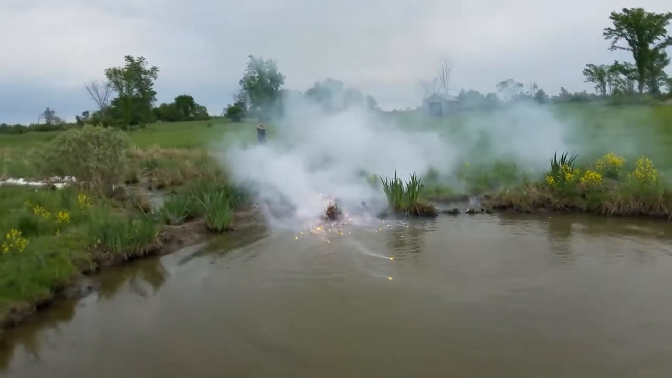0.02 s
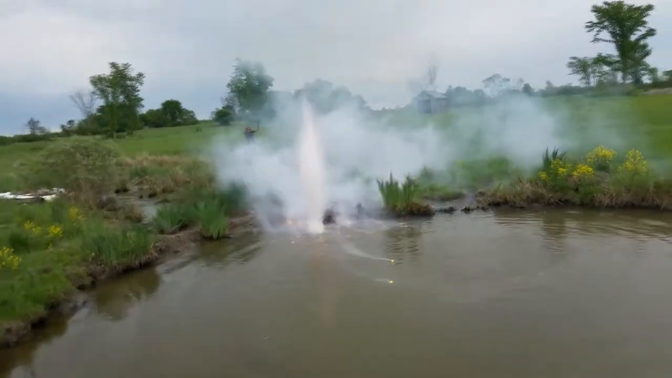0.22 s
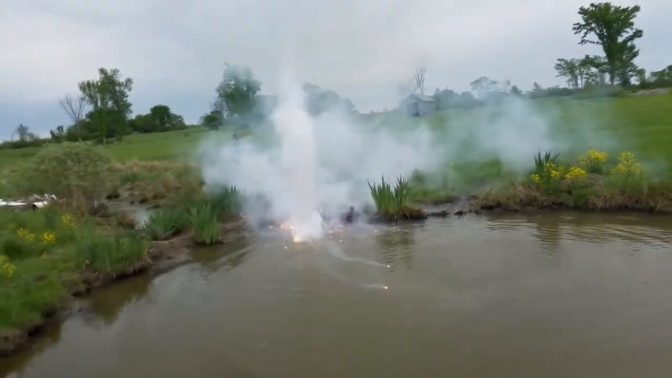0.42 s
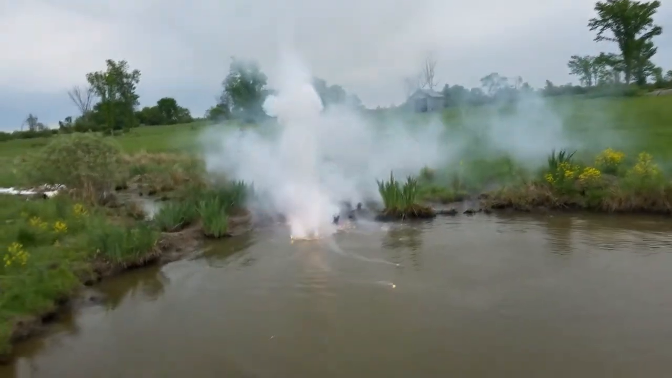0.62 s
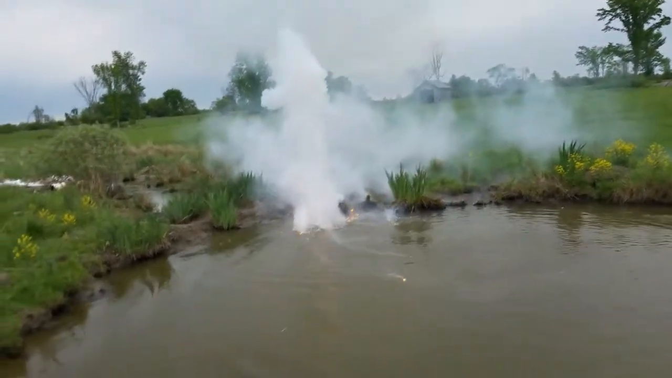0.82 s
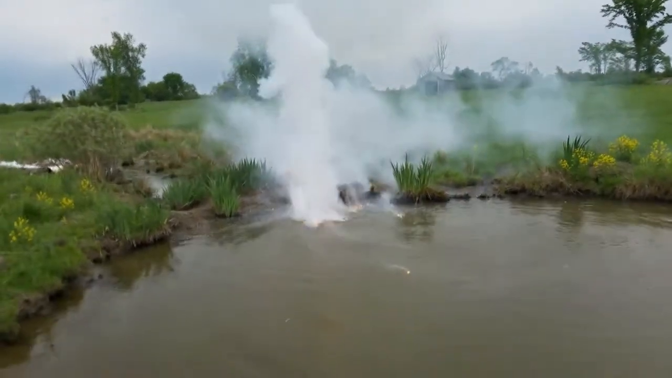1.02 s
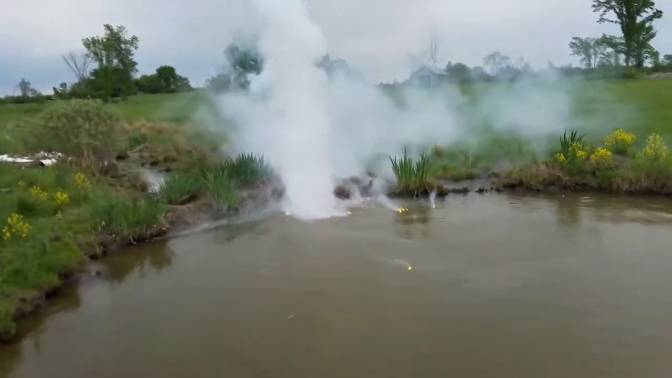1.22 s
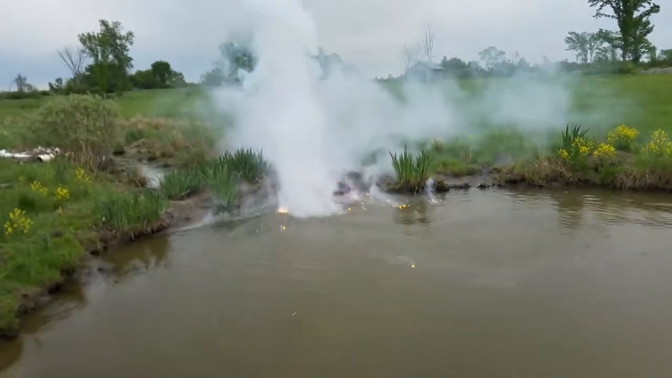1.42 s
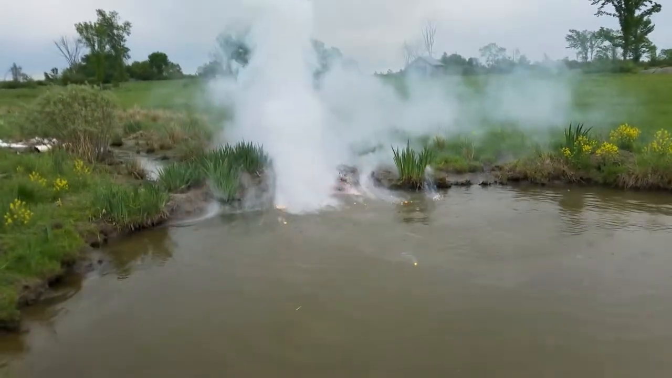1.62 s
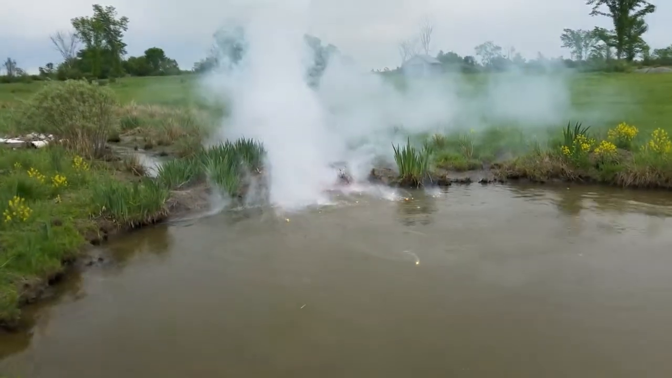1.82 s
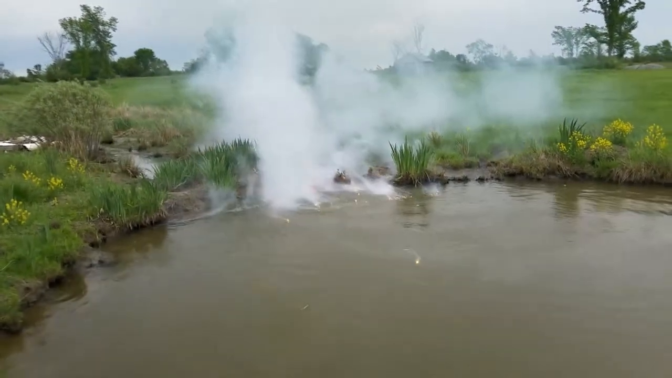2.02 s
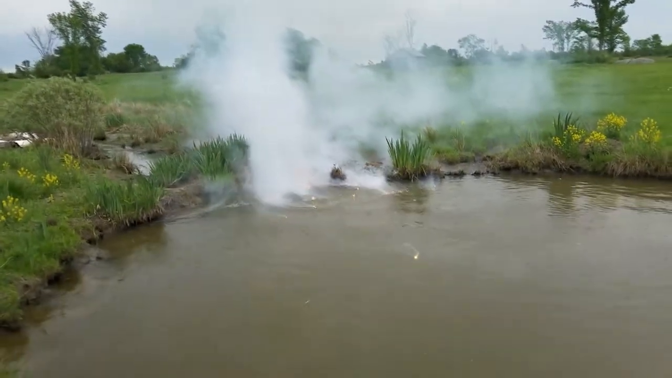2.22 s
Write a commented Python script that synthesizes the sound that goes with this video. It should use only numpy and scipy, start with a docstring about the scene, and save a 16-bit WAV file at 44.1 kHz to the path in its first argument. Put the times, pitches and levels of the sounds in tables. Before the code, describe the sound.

Sodium burning on an outdoor pond: crackling fizz and sharp pops from 0 s, then a hard bang at 0.22 s with a ringing, noisy spray burst and short dark roll. Fizz and breeze drop low. Strong pops hit at 0.47, 0.61, a cluster at 0.90-0.97, and 1.04 s. Sparse clicks and faint rising drops follow; fizz recovers from about 1.9 s, with more pops until 2.3 s.

```python
"""An outdoor pond: chunks of sodium burn on the water, some metres from two small microphone ports.
Pockets of hydrogen pop as sharp spikes that ring with their cavities; one chunk goes off as a blast
wave with a burst of noisy spray. Ticks and hiss make the fizz, single clicks the larger bubbles, and
short rising notes the drops that fall back. Echoes and dying noise give the banks and the field, over
a low wash of breeze and stirred water. Fizz and wash are heard lower after the bang, then recover."""
import sys
import numpy as np
from scipy import signal
from scipy.fft import rfft, irfft
from scipy.io import wavfile
from scipy.ndimage import uniform_filter1d

SR = 44100
rng = np.random.default_rng(int(sys.argv[2]) if len(sys.argv) > 2 else 0)


def file_out(sig):
    """Save sig as 16-bit WAV at sys.argv[1]."""
    # one column per channel
    cols = np.atleast_2d(sig).T
    # limit, then scale
    lim = np.clip(cols, -1, 1)
    pcm = np.round(lim * 32767).astype(np.int16)
    wavfile.write(sys.argv[1], SR, pcm)


N = 101430  # length of the scene in samples

# How fast scattered sound dies away: (frequency [Hz], time to fall 60 dB [s])
SCATTER_T60 = [(100, 0.074), (450, 0.1), (4000, 0.091), (9000, 0.068)]
# Level at which the open air is heard, wind included; it drops after the bang, then recovers:
# (time [s], level [dB])
AIR_HEARD = [(0, -51), (.2, -52.5), (.35, -64.5), (1.85, -66), (2.05, -64), (2.3, -49)]
WATER_WET_DB = -7.5  # scattered sound around single bubbles and drops


def amp(db):
    """Turns decibels into gain."""
    return 10 ** (np.asarray(db) / 20)


def unit(x):
    """Scales a sound to an rms (average strength) of 1."""
    return x / np.sqrt(np.mean(x ** 2) + 1e-20)


def read(points, hz):
    """Reads a (Hz, value) table, with straight lines between points on a log-frequency axis."""
    f, value = np.transpose(points)
    return np.interp(np.log(hz + 1), np.log(f + 1), value)


def level(points):
    """Gain over the whole scene from (s, dB) points."""
    return amp(np.interp(np.arange(N) / SR, *np.transpose(points)))


def add(mix, s, sound):
    """Mixes a sound in at time s, cut off at the end of the mix."""
    part = mix[:, max(round(s * SR), 0):][:, :sound.shape[-1]]
    part += sound[..., :part.shape[1]]


def colour(x, points, size=2048):
    """Filters a sound to the given (Hz, dB) shape without ringing ahead of it (minimum phase)."""
    hz = abs(np.fft.fftfreq(size, 1 / SR))
    log_gain = np.log(amp(read(points, hz)))
    spectrum = np.exp(signal.hilbert(log_gain).conj())
    taps = np.fft.ifft(spectrum).real[:size // 2]
    return signal.fftconvolve(x, taps[None], axes=1)[:, :x.shape[1]]


def ring(x, modes):
    """Raises resonances (Hz, width Hz, dB) out of a sound, as a struck cavity does."""
    out = x
    for hz, width, db in modes:
        out = out + (amp(db) - 1) * signal.lfilter(*signal.iirpeak(hz, hz / width, fs=SR), x)
    return out


def noise(size):
    """Two channels of white noise, most alike in the low middle."""
    # Left-right likeness: (frequency [Hz], likeness [0 to 1])
    likeness = [(30, 0.1), (400, 0.81), (1200, 0.56), (3000, 0.029)]
    a, b = rfft(rng.standard_normal((2, size)))
    same = np.clip(read(likeness, np.fft.rfftfreq(size, 1 / SR)), -1, 1)
    return irfft([a, same * a + np.sqrt(1 - same ** 2) * b], size)


def tail(t60, size, lumpy_db=4):
    """Scattered sound: dying noise in small uneven clumps, with an average energy of 1 per channel."""
    hz, t, z = signal.stft(noise(size), SR, nperseg=128)
    lumps = lumpy_db * np.clip(rng.standard_normal(len(t)), -2, 2)
    decay_db = -60 * t / read(t60, hz)[:, None]
    x = signal.istft(z * amp(lumps + decay_db))[1][:, :size]
    return unit(x) / np.sqrt(size)


def reflections(size):
    """The direct sound and its early echo, whose delay varies a little at random."""
    # Reflection off the water and near bank: (delay before variation [ms], level [dB])
    echoes = [(2.5, -12)]
    path = np.zeros((2, size))
    path[:, 0] = 1
    shifts = 2 * rng.random(len(echoes)) - 1
    for (ms, db), shift in zip(echoes, shifts):
        add(path, ms * (1 + 0.13 * shift) / 1000, amp([db]))
    return path


def surroundings(size, wet_db):
    """What one click becomes on its way: direct sound, echo and scattered tail."""
    return reflections(size) + amp(wet_db) * tail(SCATTER_T60, size)


def bubble(hz, wet_db, size=4096):
    """One bubble bursts: a click with a brief ring of its own pitch."""
    ring_db, pitch_over_width = 9.5, 5.14
    return ring(surroundings(size, wet_db), [(hz, hz / pitch_over_width, ring_db)])


def wind(db=-57, corner_hz=110):
    """Faint low rumble of the breeze, made separately at each port."""
    lowpass = signal.butter(2, corner_hz, fs=SR, output="sos")
    low = signal.sosfilt(lowpass, rng.standard_normal((2, N)))
    return amp(db) * unit(low * level(AIR_HEARD))


def air(patchy_db=1.5):
    """A low wash of breeze and stirred water: noise with uneven patches in pitch and time."""
    # Colour of the wash: (frequency [Hz], level [dB])
    air_tone = [(60, -2), (280, 8), (420, 1), (820, -2.5), (1300, -1), (2200, 0), (15000, -32)]
    hz, _, z = signal.stft(noise(N), SR, nperseg=1024)
    patches = rng.standard_normal(z[0].shape)
    patches = uniform_filter1d(patches, size=8, axis=0)  # smooth over frequency
    patches = unit(uniform_filter1d(patches, size=3, axis=1))  # smooth over time
    z *= amp(read(air_tone, hz)[:, None] + patchy_db * patches)
    return unit(signal.istft(z)[1][:, :N]) * level(AIR_HEARD)


def field_return(blasts):
    """The pops and the bang come back faintly from the field as a long dying tail."""
    far_db, far_t60_s = -21.5, 0.35
    field = tail([(200, far_t60_s), (12000, far_t60_s / 2)], size=32768)
    return amp(far_db) * signal.fftconvolve(blasts, field, axes=1)[:, :N]


def plops(size=4096):
    """Each drop falling back traps a bubble: a brief note that rises in pitch, blurred by scatter."""
    # Drops: (time [s], starting pitch [Hz], level before the fade [dB])
    drops = [(.0055, 1090, -27), (1.165, 827, -35.5), (1.288, 800, -31), (1.411, 900, -36.5),
             (1.455, 520, -39), (1.725, 450, -41.5), (2.096, 426, -33.5), (2.165, 440, -32.5)]
    rise_s, t60_s, glide_per_s = 0.00037, 0.0097, 2.4  # glide: share of the starting pitch
    t, out = np.arange(size) / SR, np.zeros((2, N))
    for s, hz, db in drops:
        note = np.sin(2 * np.pi * hz * (t + glide_per_s * t ** 2 / 2))
        note = note * np.minimum(t / rise_s, 1) * amp(db - 60 * t / t60_s)
        path = surroundings(size, WATER_WET_DB)
        add(out, s, signal.fftconvolve(path, note[None], axes=1))
    return out


def fizz(count=12):
    """Hundreds of tiny bubbles, in a dozen pitches, burst each second over the hiss of steam."""
    # Level at which the fizz is heard, on top of its colour; it drops after the bang, then recovers:
    # (time [s], level [dB])
    fizz_heard = [(0, -36.5), (.2, -39), (.29, -53), (1.04, -54), (1.84, -50), (2.04, -39.5), (2.3, -37.5)]
    # Colour of the fizz: (frequency [Hz], level [dB])
    fizz_tone = [(60, -17), (1000, -5), (2500, 1), (6500, 3.5), (9500, 9), (15000, 5)]
    hiss_db, crackle_db, crackle_wet_db = -8, -1.5, -5
    crackles_per_s, spread_db = 450, 8
    crackle = np.zeros((2, N))
    for hz in np.geomspace(1000, 13000, num=count):
        chance, strength = rng.random(N), rng.exponential(1, N)
        bursts = chance < crackles_per_s / count / SR
        ticks = bursts * amp(spread_db * np.minimum(strength, 3.3))
        crackle += signal.oaconvolve(ticks[None], bubble(hz, crackle_wet_db), axes=1)[:, :N]
    mix = amp(crackle_db) * unit(crackle) + amp(hiss_db) * noise(N)
    return colour(mix, fizz_tone) * level(fizz_heard)


def spits():
    """Larger bubbles burst one by one, as ringing clicks that stand out from the fizz."""
    # Larger bubbles: (time [s], level of the click before its ring [dB], pitch [Hz])
    large_bubbles = [(0.0173, -8, 5200), (.0281, -11, 4870), (.183, -0.5, 4470), (0.3352, -18, 900),
                     (0.6732, -20.5, 5150), (0.6828, -16, 2820), (0.8333, -21.5, 4000), (0.9824, -6, 4660),
                     (1.1729, -15.5, 3920), (1.2415, -21, 1300), (1.375, -23, 3900), (1.4201, -14, 3150),
                     (1.4859, -15.5, 3600), (1.5736, -26, 2940), (1.6094, -23, 4050), (1.6399, -17.5, 4100),
                     (1.7975, -26.5, 2890), (1.8463, -10.5, 4440), (1.9575, -10.5, 3700),
                     (1.991, -11, 3860), (2.0271, -8, 4300), (2.0558, -12.5, 3740), (2.1497, -11.5, 5300),
                     (2.2085, -12.5, 3060), (2.2164, -14.5, 1210)]
    out = np.zeros((2, N))
    for s, db, hz in large_bubbles:
        add(out, s, amp(db) * bubble(hz, WATER_WET_DB))
    return out


def bang(size=16384, lumpy_db=2.5):
    """A chunk blows apart: a blast wave, a ragged ringing burst of spray and its darker roll off the banks."""
    # Colour of the spray before its rings: (frequency [Hz], level [dB])
    burst_tone = [(30, 3), (270, 3.5), (430, -9.5), (750, -7.5), (1500, -1.5), (3000, -7), (5000, -12.5),
                  (8000, -7), (15000, -12.5)]
    # Narrow peaks that ring through the burst: (frequency [Hz], width [Hz], height [dB])
    burst_rings = [(540, 20, 2.5), (735, 41, 14), (866, 14.7, 12), (1246, 29, 10.5), (1480, 89, 2.5)]
    # Colour of the roll: (frequency [Hz], level [dB])
    roll_tone = [(60, -12.5), (400, -2), (800, -0.5), (2500, -12.5), (15000, -27)]
    bang_s, blast_db, blast_s = 0.2187, 10, 0.0003
    burst_db, burst_t60_s = 0, 0.072
    roll_db, roll_t60_s = -19.5, 0.21
    t = np.arange(size) / SR
    burst = unit(ring(colour(noise(size), burst_tone), burst_rings))
    burst = burst * amp(burst_db - 60 * t / burst_t60_s)
    roll = unit(colour(noise(size), roll_tone)) * amp(roll_db - 60 * t / roll_t60_s)
    wobble = unit(uniform_filter1d(rng.standard_normal(size), size=128))
    lumps = amp(lumpy_db * np.clip(wobble, -2, 2))
    # A jump in pressure that falls through zero to a dip
    blast = amp(blast_db) * (1 - t / blast_s) * np.exp(-t / blast_s)
    out = np.zeros((2, N))
    add(out, bang_s, (burst + roll) * lumps + blast)
    return out


def pops(size=8192):
    """Each pocket of gas gives a pressure spike, an echo and a scattered tail, ringing with its cavity."""
    # Hydrogen pops, before the shared trims: (time [s], level [dB], bass [dB], snap above 3 kHz [dB],
    # scattered tail [dB], thump pitch [Hz], bite pitch [Hz])
    gas_pockets = [(0.005, -1.5, -4.5, -2, -30, 1170, 1500), (0.0653, 3, -6, 4, -7, 594, 2240),
                   (0.1627, -6, 0.5, -15, -9, 517, 2400), (0.4713, 14, 3.5, -5, -0.5, 534, 2460),
                   (0.51, 4.5, 2, -2, -11, 1486, 2140), (0.606, 10.5, 4.5, -2, -12, 820, 2280),
                   (0.7893, -8.5, -1, 1, -7.5, 495, 5540), (0.8986, 7, -5, -6.5, -1.5, 1510, 5570),
                   (0.911, -4, -1, 7.5, -12, 1350, 5550), (0.9215, -2.5, 6.5, 2, 0, 1000, 4770),
                   (0.9284, 4, 1, -3, -6.5, 1130, 2700), (0.9718, 9, 5, -3.5, -1, 1360, 3760),
                   (1.0436, 16, 1, -3.5, -9.5, 541, 2440), (1.2964, -0.5, 3, 2.5, -10.5, 1314, 3640),
                   (1.5097, -7.5, 8, -4, -10, 662, 2200), (1.8798, 3.5, -5, -3.5, -9.5, 487, 3800),
                   (1.967, 1, -2, -5.5, -13, 810, 3170), (1.9869, -10.5, -1.5, 9, -2.5, 584, 3850),
                   (2.0756, 0, 1.5, 7.5, -6, 1240, 4200), (2.257, -1.5, -10, 4, -5, 634, 3000),
                   (2.274, 2, 0, -9, -20, 565, 4160), (2.2944, 9, -1, 0, -12.5, 664, 2040)]
    trim_db, top_trim_db, uneven_db = -0.5, -4.5, 1.5  # uneven: each pocket's own random colour
    cavity_db, pitch_over_width = 7, 8.56  # the cavity blown in the water rings briefly
    out = np.zeros((2, N))
    for s, db, bass, snap, wet, *pitches in gas_pockets:
        modes = [(hz, hz / pitch_over_width, cavity_db) for hz in pitches]
        path = ring(surroundings(size, wet), modes)
        tone = [(500, bass), (1200, 0.0085), (2200, 0.0074),
                (3800, snap), (5300, snap), (8000, snap + top_trim_db)]
        grid = np.geomspace(100, 16000, num=28)
        uneven = uneven_db * np.clip(rng.standard_normal(len(grid)), -2, 2)
        shape = np.transpose([grid, read(tone, grid) + uneven])
        add(out, s, amp(db + trim_db) * colour(path, shape))
    return out


def scene():
    """The reaction on the pond, its faint return from the field, and the open air."""
    blasts = pops() + bang()
    return wind() + air() + field_return(blasts) + plops() + fizz() + spits() + blasts


def record(dry):
    """Two coloured microphone ports, soft overload of loud peaks, then a cut of the highest treble."""
    # Colour of the ports: (frequency [Hz], left level [dB], right level [dB])
    port_tone = [(24.1, -31, -16.5), (69.6, -17.5, -17.5), (152, -8.5, -9), (242, -10.5, -8),
                 (465, 2.5, 3.5), (638, -1.5, -0.5), (782, 0.5, 2.5), (1370, 1.5, 2), (2084, 0, -3),
                 (2645, 5.5, -0.5), (3600, -4, 2.5), (5410, -3, -2), (5930, -24, -5.5), (7090, -13.5, -8.5),
                 (9400, -32.5, -13), (13400, -15.5, -9.5), (15400, -14.5, -21)]
    port_hz, port_width_hz = 3027, 2030  # cavity of the left port
    overload, edge_hz = 0.74, 16000  # overload: highest amplitude the soft limit lets through
    hz, left_db, right_db = np.transpose(port_tone)
    left = colour(dry[[0]], np.transpose([hz, left_db]))[0]
    right = colour(dry[[1]], np.transpose([hz, right_db]))[0]
    # The left cavity delays sound around its pitch and leaves levels alone (all-pass)
    r = np.exp(-np.pi * port_width_hz / SR)
    cavity = [1, -2 * r * np.cos(2 * np.pi * port_hz / SR), r * r]
    left = signal.lfilter(cavity[::-1], cavity, left)
    loud = overload * np.tanh(np.array([left, right]) / overload)
    lowpass = signal.firwin(255, edge_hz, window=("kaiser", 9), fs=SR)
    return signal.oaconvolve(loud, lowpass[None], "same")


dry = scene()
out = record(dry)
file_out(out)
```